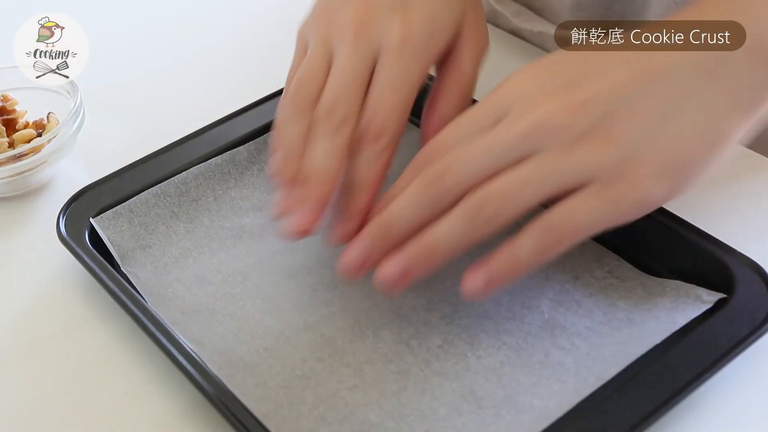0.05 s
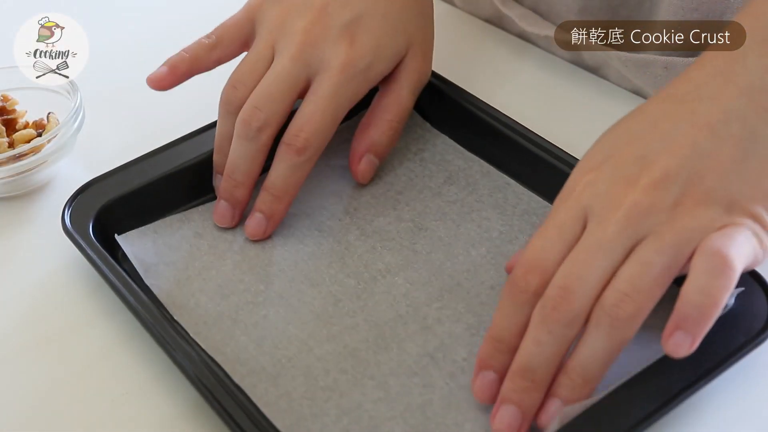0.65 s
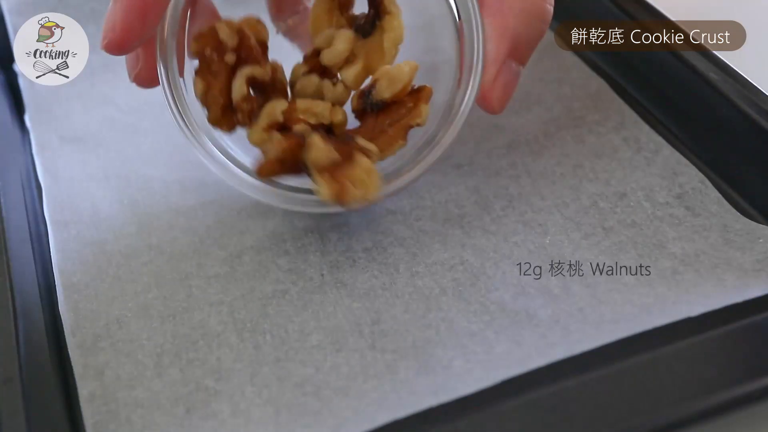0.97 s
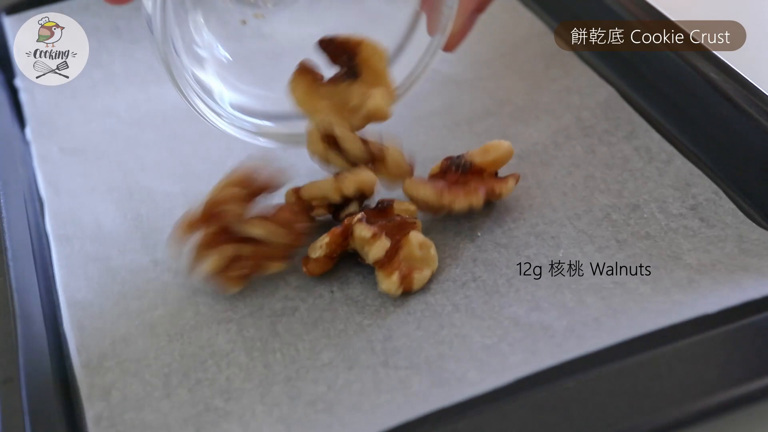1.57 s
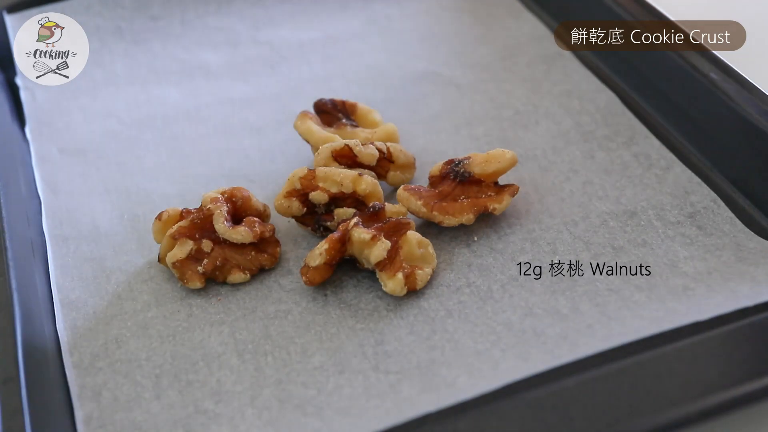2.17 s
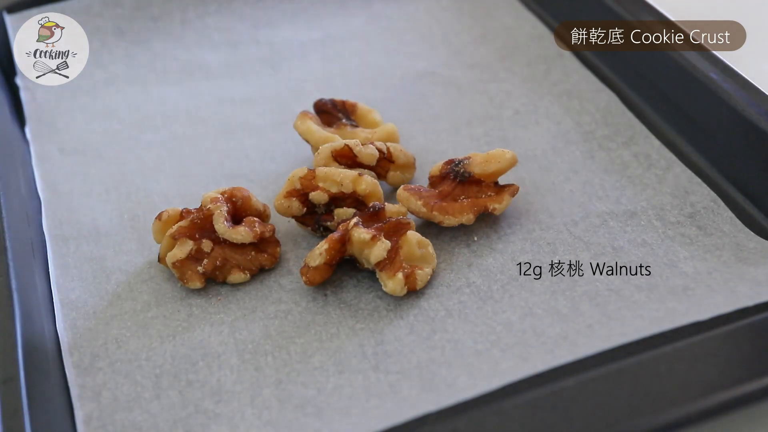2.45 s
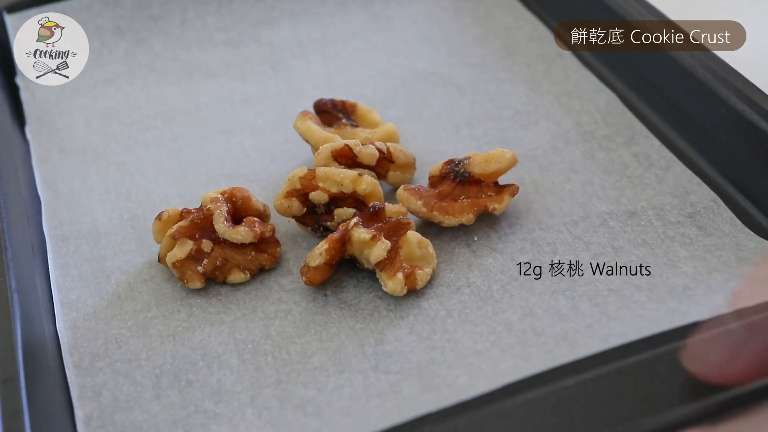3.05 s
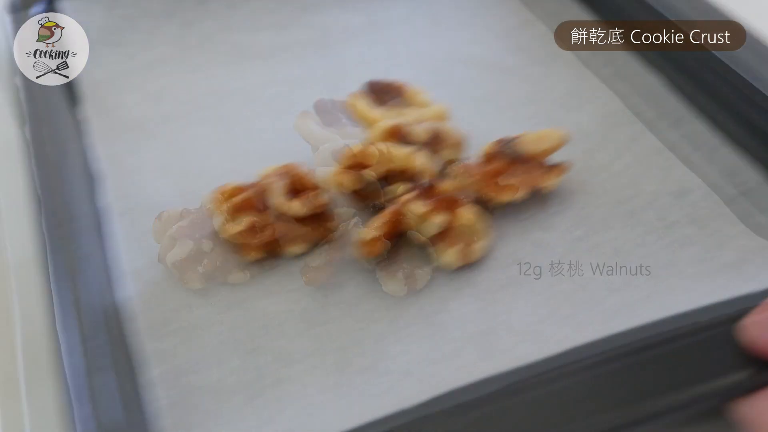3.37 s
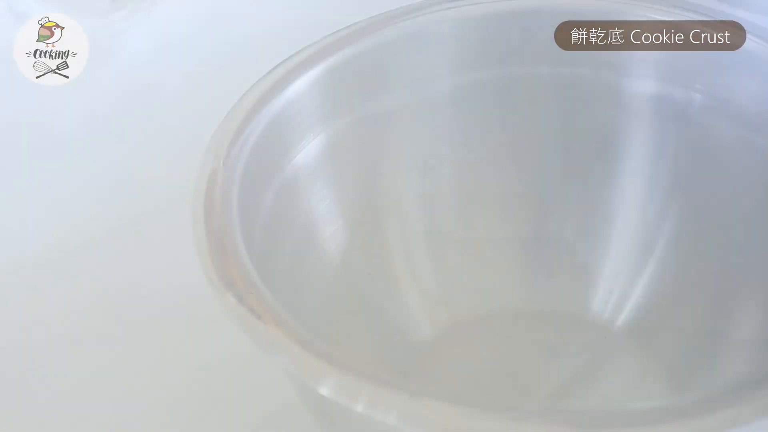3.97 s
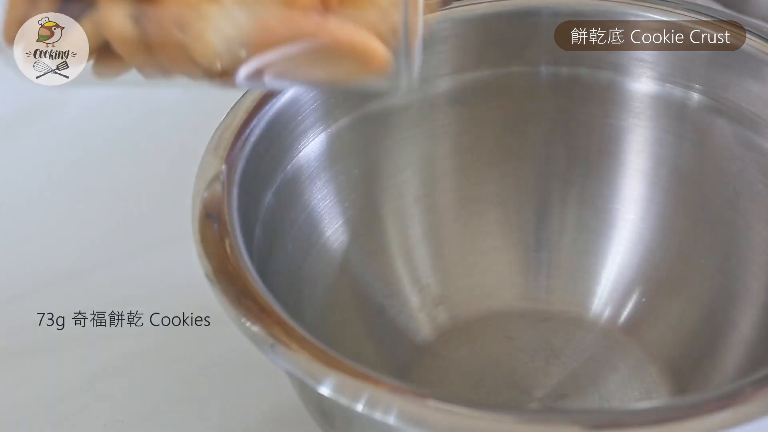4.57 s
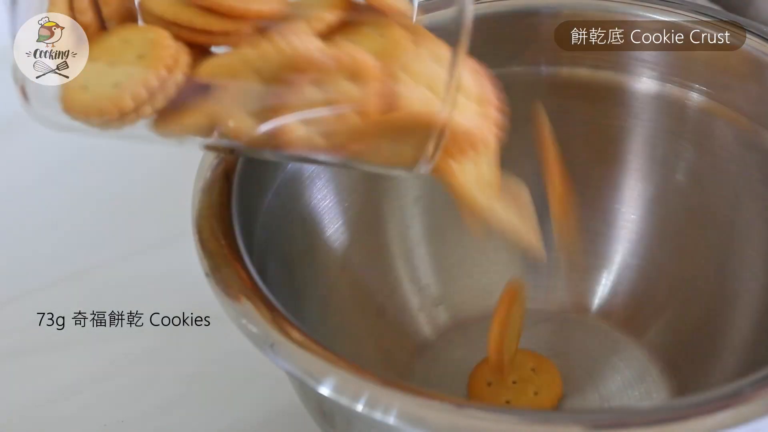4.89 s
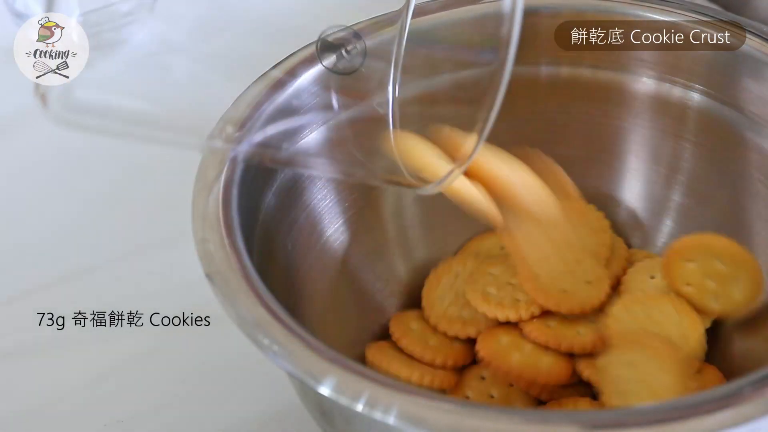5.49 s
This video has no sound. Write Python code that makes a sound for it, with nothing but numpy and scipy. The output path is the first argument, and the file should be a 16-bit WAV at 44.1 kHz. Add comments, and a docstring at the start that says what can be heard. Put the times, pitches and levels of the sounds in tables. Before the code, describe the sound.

Baking paper rustles, walnuts thud onto a tray that slides away, then hard crackers clatter loudly into a ringing steel bowl.

```python
"""Hard little crackers slip from a glass dish and clatter into a steel bowl, which rings and rocks;
the loudest blows overload the microphone. Before that, close up in a quiet kitchen, palms smooth
baking paper into a tray, walnuts thud, clack and roll on it, and the tray scrapes away over the counter.
A mechanical timer ticks faintly across the room until the pour begins."""
import sys
import numpy as np
from scipy import signal
from scipy.fft import rfft, irfft, next_fast_len
from scipy.io import wavfile
from scipy.ndimage import uniform_filter1d, map_coordinates

SR = 44100
rng = np.random.default_rng(int(sys.argv[2]) if len(sys.argv) > 2 else 0)


def waveform_to_disk(signal):
    """Save audio, clipped to [-1, 1], as 16-bit WAV at the path in sys.argv[1]."""
    frames = np.transpose(np.atleast_2d(signal))
    scaled = np.clip(frames, -1, 1) * 32767
    samples = np.round(scaled).astype(np.int16)
    wavfile.write(sys.argv[1], SR, samples)


N = 247842
HIT_SAMPLES, TOP_HZ = 8192, 15700


def amp(db):
    """Decibels to gain."""
    return 10 ** (np.asarray(db) / 20)


def unit(x):
    """Scaled to rms 1."""
    return x / np.sqrt(np.mean(x ** 2) + 1e-20)


def along(points, hz):
    """Reads a curve of (Hz, value) points on a log frequency axis."""
    freqs, values = np.transpose(points)
    return np.interp(np.log(hz + 1), np.log(freqs + 1), values)


def add(track, s, sound):
    """Mixes a stereo sound into the track at s seconds."""
    start = int(np.clip(round(s * SR), 0, N - 1))
    track[:, start:start + sound.shape[1]] += sound[:, :N - start]


def colour(spectrum):
    """Minimum-phase impulse response of an EQ curve of (Hz, dB) points."""
    gain = amp(along(spectrum, np.fft.rfftfreq(HIT_SAMPLES, 1 / SR)))
    cepstrum = irfft(np.log(gain + 1e-6))
    cepstrum[1:HIT_SAMPLES // 2] *= 2
    cepstrum[HIT_SAMPLES // 2 + 1:] = 0
    return irfft(np.exp(rfft(cepstrum)))


def body(modes, soft_hz):
    """Impulse response of damped resonances; the give of the contact rounds off the treble."""
    f = np.fft.rfftfreq(HIT_SAMPLES, 1 / SR)
    ringing = sum((-1) ** k * amp(db) * 1j * f * bandwidth / (hz * hz - f * f + 1j * f * bandwidth)
                  for k, (hz, bandwidth, db) in enumerate(modes))
    return irfft(ringing / (1 + 1j * f / soft_hz) ** 2)


def through(x, response):
    """A signal passed through an impulse response."""
    return signal.fftconvolve(x, np.atleast_2d(response), axes=1)[:, :x.shape[1]]


def stereo_noise(size, width):
    """White noise with a side part width times as strong as its mid."""
    mid, side = rng.standard_normal((2, size))
    return np.array([mid + width * side, mid - width * side])


def hit(response, t60, width, tap, rise, tint_db):
    """One contact: a tap and a short crumbling burst excite a body; its loudest 4 ms have rms 1."""
    t = np.arange(HIT_SAMPLES) / SR
    force = stereo_noise(HIT_SAMPLES, width) * amp(-60 * t / t60) * (1 - np.exp(-t / rise))
    force /= np.linalg.norm(force[0])
    force[:, 0] += tap
    # every piece has its own shape, and so its own colour
    bands = np.geomspace(300, 16000, 24)
    tint = colour(np.column_stack([bands, tint_db * rng.standard_normal(len(bands))]))
    sound = through(through(force, tint), response)
    power = uniform_filter1d(np.mean(sound ** 2, axis=0), size=176)
    return sound / np.sqrt(power.max())


def hits(rows, response, t60, width, tap, rise=0.0002, tint_db=1):
    """A contact for each (s, dB) row; a third column pans it, in dB of left over right."""
    track = np.zeros((2, N))
    for row in rows:
        pan_db = row[2] if len(row) > 2 else 0
        sides = unit(amp([[pan_db / 2], [-pan_db / 2]]))
        add(track, row[0], amp(row[1]) * sides * hit(response, t60, width, tap, rise, tint_db))
    return track


def weighted(landings, slope):
    """(s, dB, pan dB) rows for one layer: each landing's level plus slope times its kind of contact."""
    return [(s, db + slope * contact, pan) for s, db, contact, pan in landings]


def grains(response, rate, spread_db, smooth, width):
    """Steady friction of rms 1: rate tiny contacts a second, uneven in size, over a smooth hiss."""
    chance, size = rng.random(N), np.clip(rng.standard_normal(N), -2, 2)
    contacts = (chance < rate / SR) * amp(spread_db * size)
    bursts = unit(signal.lfilter([1], [1, -np.exp(-1 / (0.00085 * SR))], contacts))
    return unit(through(stereo_noise(N, width) * (bursts + smooth), response))


def swells(rows, attack, release):
    """Envelope that holds each (start s, end s, dB) row; attack and release are seconds per 20 dB."""
    t = np.arange(N) / SR
    levels = [db - 20 * (np.maximum(start - t, 0) / attack + np.maximum(t - end, 0) / release)
              for start, end, db in rows]
    return amp(np.maximum(np.max(levels, axis=0), -200))


def waver(rate, depth_db):
    """A gain that wanders smoothly at random, rate times a second."""
    knots = rng.standard_normal(1024)
    return amp(depth_db * map_coordinates(knots, [np.arange(N) * rate / SR], mode="mirror"))


# EQ of the room tone (frequency [Hz], gain [dB])
ROOM_EQ = [(12, -51), (20, -1.5), (47, -1.5), (90, -17), (112, -11.5), (332, -19.5), (427, -14), (613, -22),
           (880, -20.5), (983, -25.5), (1620, -23.5), (1860, -24), (2680, -25.5), (4180, -33.5),
           (15400, -41)]


def room_tone():
    """The steady low hush of the room."""
    hush = through(stereo_noise(N + HIT_SAMPLES, width=0.64), colour(ROOM_EQ))
    return amp(-58) * unit(hush[:, HIT_SAMPLES:])


# palm strokes (start [s], end [s], level [dB])
STROKES = [(0.23, 0.36, -52), (0.375, 0.465, -49), (0.485, 0.51, -43.5), (0.53, 0.59, -52.5),
           (0.69, 0.712, -54)]
# crease snaps and finger presses (time [s], level [dB])
CREASES = [(0.279, -33), (0.412, -40), (0.5592, -25.5), (0.569, -50)]
PRESSES = [(0.185, -56.5), (0.22, -49), (0.56, -49), (0.59, -48)]
# airy brush, bright snap, and a low rumble shared with the bowl (frequency [Hz], gain [dB])
BRUSH_EQ = [(710, -85), (1200, -26), (1570, -26), (1920, 0), (2560, -9.5), (3210, -0.5), (5540, 2),
            (9760, 0.5), (13700, -2), (15400, -7)]
SNAP_EQ = [(1200, -28), (2200, -13), (5000, -6), (9000, -1.5), (14000, -6), (15500, -3.5)]
RUMBLE_EQ = [(20, -22), (32, -12), (42, 3), (57, -13.5), (74, 3.5), (86, -7.5), (97, 0.5), (118, -17),
             (250, -27), (500, -133)]


def paper():
    """Palms brush the baking paper flat with uneven pressure and press the tray; a few creases snap."""
    pressure = swells(STROKES, attack=0.057, release=0.029) * waver(rate=24.8, depth_db=4.5)
    brush = pressure * grains(colour(BRUSH_EQ), rate=500, spread_db=4, smooth=1.2, width=0.9)
    snaps = hits(CREASES, colour(SNAP_EQ), t60=0.014, width=1.0, tap=0.49)
    presses = hits(PRESSES, colour(RUMBLE_EQ), t60=0.19, width=2.2, tap=0.32)
    return amp(1.5) * brush + amp(-2.5) * snaps + amp(0.5) * presses


# even runs of ticking, with a skip between them (first beat [s], end [s])
TICK_RUNS = [(0.632, 3.5), (3.6588, 4.7)]
# thin tick of the timer (frequency [Hz], gain [dB])
TICK_EQ = [(880, -5), (1500, -2), (2020, 3.5), (2650, -13), (3540, -8), (5610, -5), (7010, -11.5),
           (7940, -3.5), (9820, -20), (12400, -7), (15000, -22)]


def timer():
    """A mechanical timer across the room: strong and weak beats in turn, blurred by the walls."""
    beat_s, tick_db, tock_db = 0.2284, -54.5, -64.5
    beats = [(s, tock_db if k % 2 else tick_db)
             for first, end in TICK_RUNS for k, s in enumerate(np.arange(first, end, beat_s))]
    return hits(beats, colour(TICK_EQ), t60=0.31, width=0.79, tap=0.21)


# landings: hard ones (nut on nut) clack, soft ones (flat on the tray) thud
# (time [s], level [dB], hardness [dB], pan left [dB])
NUTS = [(1.0643, -29, -17, 3.5), (1.0737, -41.5, -32, -2.5), (1.2797, -39, -3.5, -3), (1.3154, -42, 1, 6),
        (1.3346, -32.5, 0.5, -8), (1.3525, -28, -1, 0), (1.3917, -35.5, -6, -3), (1.4453, -17.5, 6, -2.5),
        (1.4874, -30.5, -6.5, -1), (1.5675, -30, -3, -1), (1.592, -22.5, 13, 0), (1.6233, -22.5, 6.5, 0),
        (1.6527, -24, 19, -0.5), (1.6882, -35.5, 0, -2), (1.8294, -39, -1.5, -4), (1.8568, -31, -6, 0.5),
        (1.9803, -52, -11, -8)]
# the tray's body and the flex of its thin floor (frequency [Hz], bandwidth [Hz], gain [dB])
TRAY_MODES = [(106, 32, -8.5), (286, 25, 3.5), (467, 68, 2.5), (622, 61, 1.5), (800, 130, -5.5),
              (1010, 100, -15)]
FLEX_MODES = [(71, 7.7, -5), (102.5, 10.7, -1)]
# woody knock, shell clack and papery scuff (frequency [Hz], gain [dB])
KNOCK_EQ = [(250, -15), (450, 7), (750, 18), (1150, 11), (1400, 10), (1950, 7.5), (2400, -4), (2900, -45),
            (4500, -43), (9000, -53)]
CLACK_EQ = [(1400, -15), (1750, -3.5), (1950, 9.5), (2300, -5), (3100, 2.5), (3480, 2), (3850, -9),
            (4400, -12), (8000, -41)]
SCUFF_EQ = [(2000, -7), (4500, -10.5), (6500, -6.5), (9000, -16.5), (15000, -25)]


def walnuts():
    """Each nut thumps and flexes the tray, knocks and clacks in its own tone, scuffs the paper, rolls."""
    thud = hits(weighted(NUTS, -1.02), body(TRAY_MODES, soft_hz=1210), t60=0.019, width=1.0, tap=0.93)
    flex = hits(weighted(NUTS, -0.82), body(FLEX_MODES, soft_hz=200), t60=0.025, width=1.8, tap=0.36)
    knock = hits(weighted(NUTS, 0.11), colour(KNOCK_EQ),
                 t60=0.038, width=0.9, tap=0.21, rise=0.00055, tint_db=1.8)
    clack = hits(weighted(NUTS, 1), colour(CLACK_EQ),
                 t60=0.013, width=0.34, tap=0.78, rise=0.00072, tint_db=1.8)
    scuff = hits(weighted(NUTS, 0.15), colour(SCUFF_EQ),
                 t60=0.016, width=1.0, tap=0.14, rise=0.00026, tint_db=1.8)
    roll_s, roll_db = 0.037, -19  # relative to each landing
    rolls = [(s + roll_s / 2, s + roll_s, db + roll_db) for s, db, _, _ in NUTS]
    roll = grains(colour(KNOCK_EQ), rate=170, spread_db=-1, smooth=0.41, width=0.45)
    roll *= swells(rolls, attack=0.012, release=0.04)
    return (amp(-10) * thud + amp(-17) * flex + amp(-3) * knock + amp(-17) * clack
            + amp(-14.5) * scuff + roll)


# bumps of the tray's rim (time [s], level [dB])
BUMPS = [(3.535, -35), (3.543, -39.5)]
# sliding hiss, midrange scrape and dull bump (frequency [Hz], gain [dB])
HISS_EQ = [(1470, -11), (2500, -16), (3290, -4), (4670, -1), (5650, 5.5), (6190, 2.5), (7960, 2),
           (15400, -9.5)]
SCRAPE_EQ = [(900, -41), (1400, -3.5), (2100, 4.5), (2650, -1), (2900, 5), (3400, 0.5), (5000, -23),
             (9000, -42)]
BUMP_EQ = [(150, -22), (350, -10.5), (700, -7), (1000, -10), (1500, 3.5), (2200, -2), (2900, -11),
           (4000, -12), (7000, -33)]


def tray_slide():
    """The tray hisses louder as it speeds over the counter, scrapes at full speed, and bumps its rim."""
    start_s, stop_s, brake_s = 3.149, 3.54, 0.045
    t = np.arange(N) / SR
    speed = np.clip((t - start_s) / (stop_s - start_s), 0, 1)
    speed *= amp(-20 * np.maximum(t - stop_s, 0) / brake_s)
    hiss = grains(colour(HISS_EQ), rate=2800, spread_db=12, smooth=3.4, width=0.97)
    hiss *= amp(-43) * np.minimum(speed, 0.85) ** 1.24
    scrape = grains(colour(SCRAPE_EQ), rate=480, spread_db=5, smooth=1.0, width=0.57)
    scrape *= amp(-41.5) * speed ** 6 + amp(-56) * np.sqrt(speed)
    bumps = hits(BUMPS, colour(BUMP_EQ), t60=0.086, width=0.78, tap=0.22)
    return hiss + scrape + amp(3) * bumps


# crackers slip along the glass, and one squeaks (start [s], end [s], level [dB])
SLIPS = [(4.22, 4.235, -59), (4.435, 4.62, -45)]
SQUEAKS = [(4.518, 4.53, -37.5)]
# crackers shift in the dish (time [s], level [dB])
SHIFTS = [(4.387, -37), (4.391, -29), (4.4235, -26), (4.4265, -33), (4.510, -31), (4.518, -33.5),
          (4.577, -41), (4.676, -30)]
# rub and tick against the glass (frequency [Hz], gain [dB])
SLIP_EQ = [(1200, -12), (1950, 2), (2900, -5.5), (4300, -5), (5800, -3.5), (7500, 0.5), (8500, -9.5),
           (9500, -11.5), (15000, -19)]
DISH_TICK_EQ = [(760, -31), (1300, -27), (1520, -33), (1940, 1.5), (2150, -14), (2480, -11), (4090, -16),
                (5450, -24), (5730, -8), (6620, -20), (7110, -9), (7630, -21), (8540, -12), (8810, -25),
                (15000, -30)]
# glassy clink and squeak (frequency [Hz], bandwidth [Hz], gain [dB])
GLASS_MODES = [(1960, 70, -7), (4430, 95, -4.5), (5870, 120, -11), (7190, 68, 4), (8200, 50, -7)]
SQUEAK_MODES = [(2545, 53, 0), (4540, 16, -3)]


def glass_dish():
    """Crackers slip, tick, clink and squeak against the tilting glass dish."""
    slip = grains(colour(SLIP_EQ), rate=570, spread_db=-5, smooth=1.0, width=0.84)
    slip *= swells(SLIPS, attack=0.12, release=0.21)
    ticks = hits(SHIFTS, colour(DISH_TICK_EQ), t60=0.028, width=0.94, tap=0.21, rise=0.0014, tint_db=4.5)
    clinks = hits(SHIFTS, body(GLASS_MODES, soft_hz=14000), t60=0.0084, width=0.64, tap=0.35)
    squeak = grains(body(SQUEAK_MODES, soft_hz=12000), rate=650, spread_db=10, smooth=1.3, width=0.79)
    squeak *= swells(SQUEAKS, attack=0.015, release=0.068)
    return amp(-3.5) * (slip + ticks) + amp(-6.5) * clinks + squeak


# the loudest landings, on bare steel (+) or on other crackers (-)
# (time [s], level [dB], steel contact [dB], pan left [dB])
CRACKERS = [(4.6855, 3, 1, 0), (4.6943, -11, 2, 9), (4.7041, -6.5, -3, -1.5), (4.7898, -9, 3.5, -3.5),
            (4.8434, -3.5, 2, -5.5), (4.848, -2.5, 1, 1), (4.8873, -15, -5, -1), (4.904, -11.5, 2, -5),
            (4.9182, -2.5, 5.5, -14), (4.9315, -5.5, -3.5, 4), (4.9391, -2.5, 1.5, 0),
            (4.9699, -8, 6.5, -11), (4.995, -2.5, 3.5, -3), (5.0106, -7.5, -4, -1), (5.0466, 1, -1, -8.5),
            (5.0554, -14, -10.5, 9), (5.0871, -10.5, 3, 2), (5.1073, -11.5, 2, 0), (5.131, -7, -2, -3),
            (5.1518, -9.5, -1, -2), (5.1906, -13.5, -2, 2), (5.2138, -11, 1, -3), (5.2319, -13, 3.5, -9),
            (5.264, -16.5, 1.5, -10), (5.2951, -12, -0.5, -1.5), (5.3412, -21.5, -1, 0),
            (5.3475, -11.5, 2, 0), (5.4173, -17.5, 2, -5), (5.5285, -13.5, 2, -3), (5.553, -24.5, -4, 1)]
# the bowl's wall, floor and upper resonances (frequency [Hz], bandwidth [Hz], gain [dB])
WALL_MODES = [(1101, 36, -6), (1250.5, 76, -4), (1355, 84, -6), (1556, 51, 4.5), (1646, 84, 1.5)]
FLOOR_MODES = [(232, 14, -24.5), (326.5, 25, -18), (540, 89, -14), (665, 122, -8), (872, 35, 0.5),
               (1017, 37, -1.5), (1123, 31, 1.5)]
HIGH_MODES = [(1990, 79, -5.5), (2778, 163, 3.5), (3216, 280, -2.5), (3570, 37, 7.5), (4100, 97, -26),
              (5144, 116, -2)]
# crisp top end of dry cracker edges (frequency [Hz], gain [dB])
CRISP_EQ = [(2240, -33), (3800, -3), (4200, 5.5), (4590, -3), (4750, -5.5), (5160, 0.5), (6260, -1),
            (7000, -1.5), (7780, 5), (8640, -2.5), (9380, 1.5), (10600, -5), (11700, -6), (13200, -7.5),
            (15400, -18.5)]


def cracker_impacts():
    """Hard crackers clang and thump on the steel, and clack crisply on each other."""
    clang = hits(weighted(CRACKERS, 0.82), body(WALL_MODES, soft_hz=4400),
                 t60=0.015, width=0.83, tap=0.61, rise=0.00094)
    thump = hits(weighted(CRACKERS, 0.42), body(FLOOR_MODES, soft_hz=2530),
                 t60=0.01, width=0.67, tap=0.29, rise=0.0008)
    clack = hits(weighted(CRACKERS, -0.9), body(HIGH_MODES, soft_hz=9000),
                 t60=0.022, width=0.61, tap=0.62, tint_db=1.8)
    edge = hits(weighted(CRACKERS, -1.44), colour(CRISP_EQ),
                t60=0.071, width=1.12, tap=0.028, rise=0.00029, tint_db=1.8)
    return amp(-3.5) * clang + amp(-9) * thump + amp(-6.5) * clack + amp(-10.5) * edge


def edge_clicks(response, begin_s, rate, decay_s, spread_db):
    """Dry edges click together, rms 1: tiny pings of random pitch, with their own phase on each side."""
    first = int(begin_s * SR)
    span = N - first
    draws = rng.random((int(rate * span / SR), 5))
    start, pitch, size, *phases = draws.T[:, :, None]
    t = np.arange(256) / SR
    index = (start * span).astype(int) + np.arange(len(t))
    envelope = amp(spread_db * size) * np.exp(-t / decay_s)
    pings = [envelope * np.sin(2 * np.pi * (pitch * TOP_HZ * t + phase)) for phase in phases]
    clicks = np.array([np.bincount(index.ravel(), side.ravel(), N)[:span] for side in pings])
    return np.pad(unit(through(clicks, response)), ((0, 0), (first, 0)))


# the pour: first few, main slide, stragglers (start [s], end [s], flow [dB])
SURGES = [(4.705, 4.72, -9), (4.94, 5.22, 0), (5.39, 5.52, -7.5)]
# midrange rattle of the heap (frequency [Hz], gain [dB])
HEAP_EQ = [(110, -58), (180, -18), (312, -13.5), (383, -27.5), (526, -8), (783, -8), (862, -4.5),
           (962, -10.5), (1090, -10.5), (1450, -4), (1580, -4.5), (2080, -14), (2850, -13), (3220, -16),
           (4800, -36), (6240, -90.5), (10600, -120)]


def cracker_heap(begin_s):
    """The flow rattles the heap; edges click and faces rub in a rustle that grows faster than the flow."""
    flow = swells(SURGES, attack=0.17, release=0.27)
    rattle = grains(colour(HEAP_EQ), rate=400, spread_db=1.5, smooth=0.63, width=0.82)
    rustle = flow ** 1.62 * waver(rate=42, depth_db=2.5)
    clicks = edge_clicks(colour(CRISP_EQ), begin_s, rate=3500, decay_s=0.00089, spread_db=35)
    rub = grains(colour(CRISP_EQ), rate=1500, spread_db=-1, smooth=0.94, width=0.73)
    return amp(-19.5) * flow * rattle + rustle * (amp(-25.5) * clicks + amp(-26.5) * rub)


# long-ringing partials of the bowl's rim (frequency [Hz], level [dB])
RIM_PARTIALS = [(538, -10), (868, -6.5), (1103, 1.5), (1330, 2.5), (1453, -24), (1613, -13), (2059, -12.5),
                (2266, -2.5), (2747, -7.5), (3060, -7.5), (3560, -14), (4061, -14), (8061, -26),
                (8453, -22)]


def rim_ring(blows, t60, damped_hz):
    """The free rim sings on after the blows; high partials die first, each with its own stereo phase."""
    t = np.arange(2 * SR) / SR
    phases = rng.uniform(0, 2 * np.pi, (len(RIM_PARTIALS), 2, 1))
    strikes = blows.mean(axis=0, keepdims=True)
    ring = np.zeros((2, N))
    for (hz, db), phase in zip(RIM_PARTIALS, phases):
        partial = np.sin(2 * np.pi * hz * t + phase) * amp(-60 * t * (1 + hz / damped_hz) / t60)
        ring += amp(db) * unit(through(strikes, partial))
    return unit(ring) * np.std(blows)


# the bowl rocks as the weight shifts (start [s], end [s], level [dB])
ROCKS = [(4.69, 4.72, -31), (4.93, 5.03, -23), (5.165, 5.29, -21.5), (5.35, 5.49, -30.5),
         (5.54, 5.58, -25.5)]


def steel_bowl():
    """Impacts and the tumbling heap set the rim ringing, while the bowl rumbles, rocking on the counter."""
    first_landing_s = CRACKERS[0][0]
    landed = np.arange(N) / SR > first_landing_s
    blows = cracker_impacts() + landed * cracker_heap(first_landing_s)
    rocking = grains(colour(RUMBLE_EQ), rate=340, spread_db=3.5, smooth=0.83, width=1.74)
    rocking *= landed * swells(ROCKS, attack=0.086, release=0.1)
    ring = rim_ring(blows, t60=2.1, damped_hz=6000)
    return blows + amp(-15.5) * ring + amp([[1.5], [-2]]) * rocking


# decay of the kitchen walls (frequency [Hz], t60 [s])
KITCHEN_DECAY = [(100, 0.24), (500, 0.22), (1500, 0.41), (4000, 0.34), (12000, 0.15)]


def kitchen_reverb(send):
    """The walls answer, the top end dying first; each moment gets its own echo pattern."""
    wet, step, predelay_s = np.zeros((2, N)), SR // 10, 0.006
    window = signal.get_window("hann", 2 * step)  # overlapping slices add up to the whole sound
    for start in range(0, N, step):
        hz, t, noise = signal.stft(rng.standard_normal((2, SR // 3)), SR, nperseg=256)
        decay = amp(-60 * t / along(KITCHEN_DECAY, hz)[:, None])
        tail = signal.istft(noise * decay, SR, nperseg=256)[1]
        tail /= np.linalg.norm(tail[0])
        piece = send[:, start:start + 2 * step]
        echo = signal.fftconvolve(piece * window[:piece.shape[1]], tail, axes=1)
        add(wet, start / SR + predelay_s, echo)
    return wet


def scene():
    """Work at the tray, then the pour into the bowl, over the timer and the room tone."""
    at_tray = paper() + walnuts() + tray_slide()
    at_bowl = glass_dish() + steel_bowl()
    reverb = kitchen_reverb(amp(-5) * at_tray + amp(-8) * at_bowl)
    return at_tray + at_bowl + reverb + timer() + room_tone()


def record(dry):
    """The loudest blows overload the microphone into soft clipping; everything above TOP_HZ is cut."""
    clipped = dry / (1 + np.abs(dry) ** 8) ** (1 / 8)
    size = next_fast_len(N + HIT_SAMPLES)
    passband = np.fft.rfftfreq(size, 1 / SR) < TOP_HZ
    return irfft(rfft(clipped, size) * passband, size)[:, :N]


dry = scene()
out = record(dry)
waveform_to_disk(out)
```